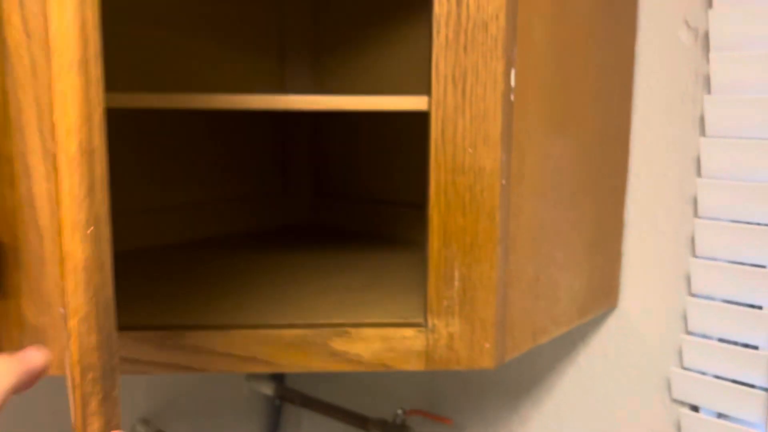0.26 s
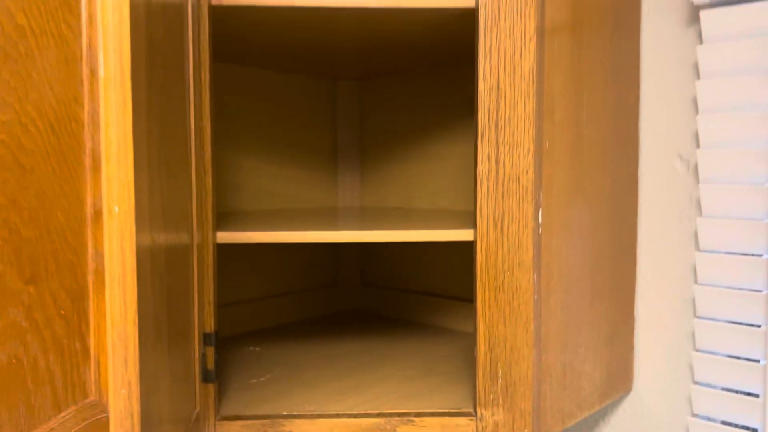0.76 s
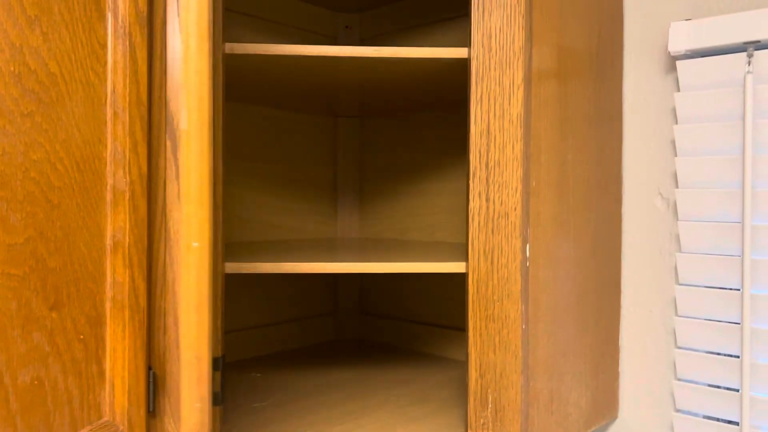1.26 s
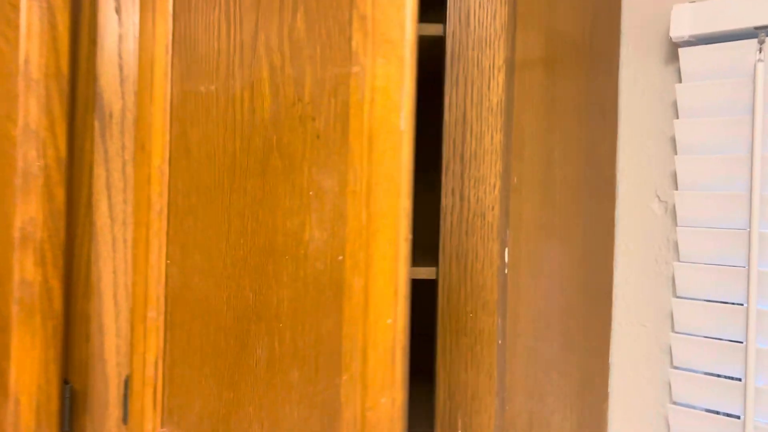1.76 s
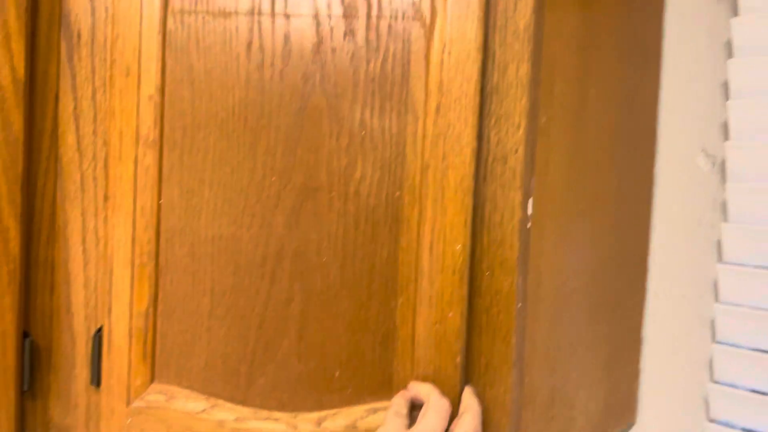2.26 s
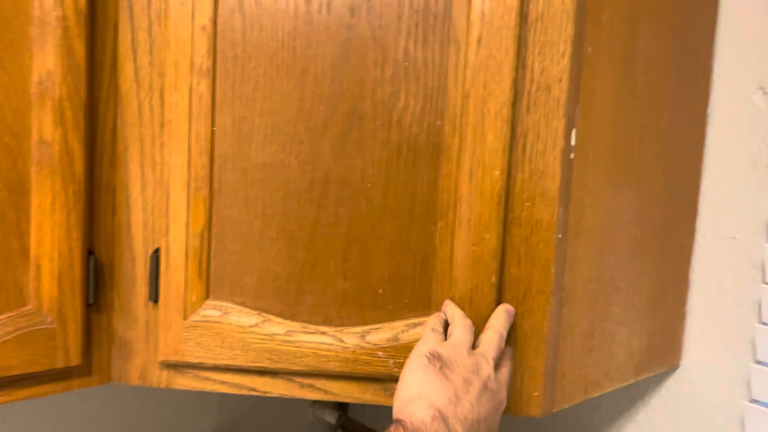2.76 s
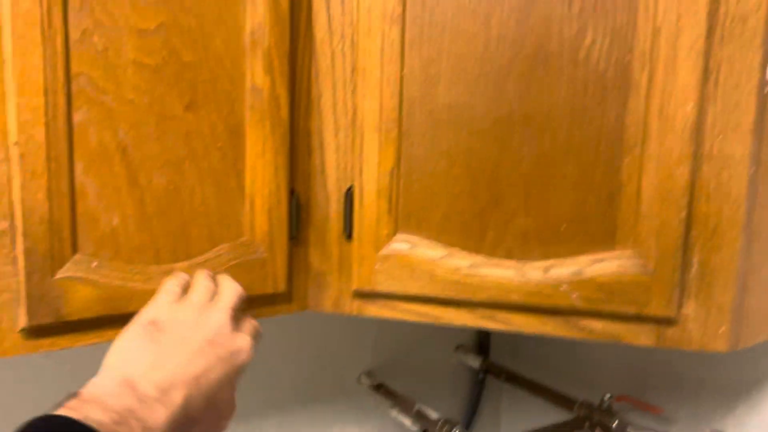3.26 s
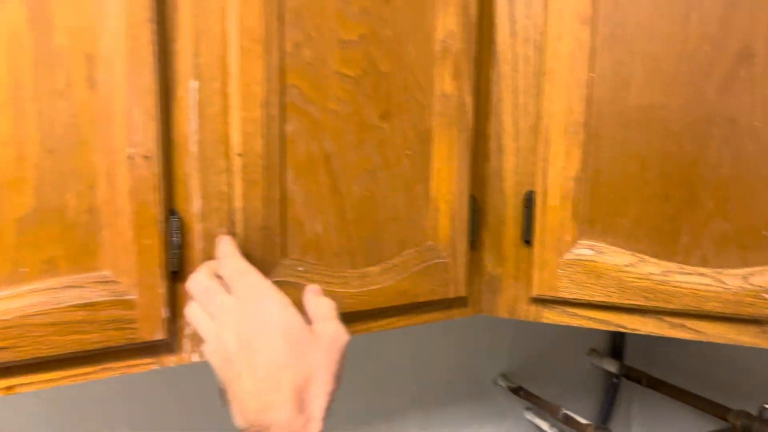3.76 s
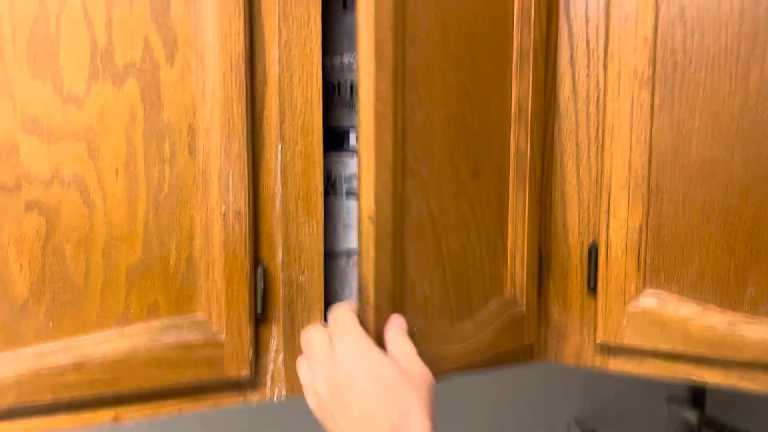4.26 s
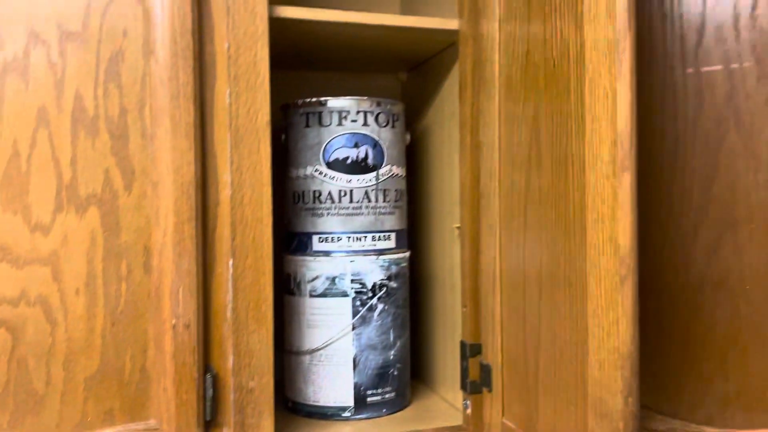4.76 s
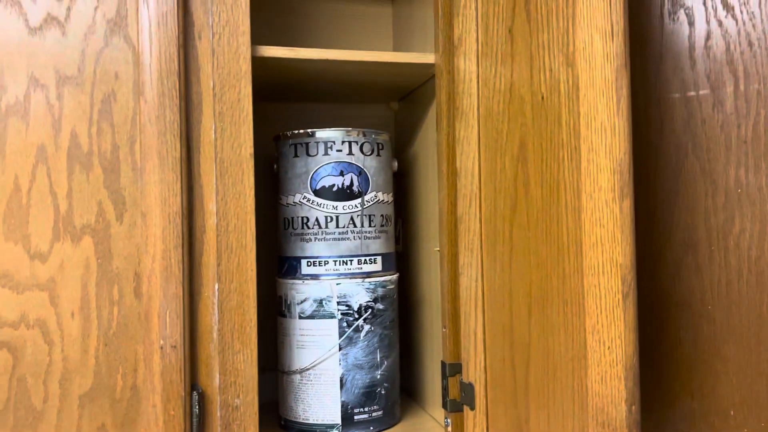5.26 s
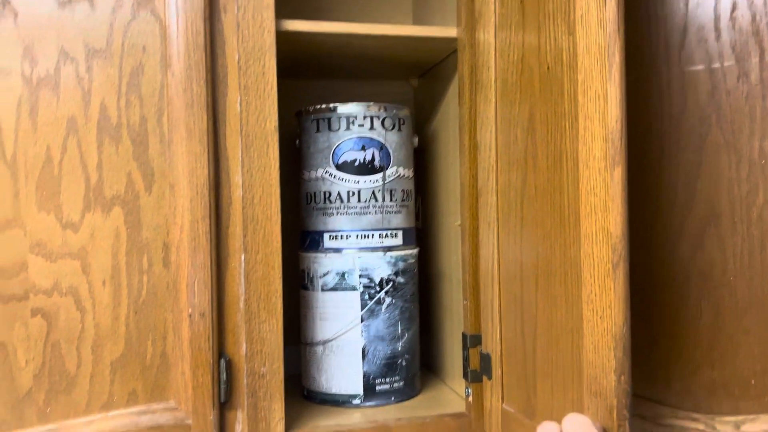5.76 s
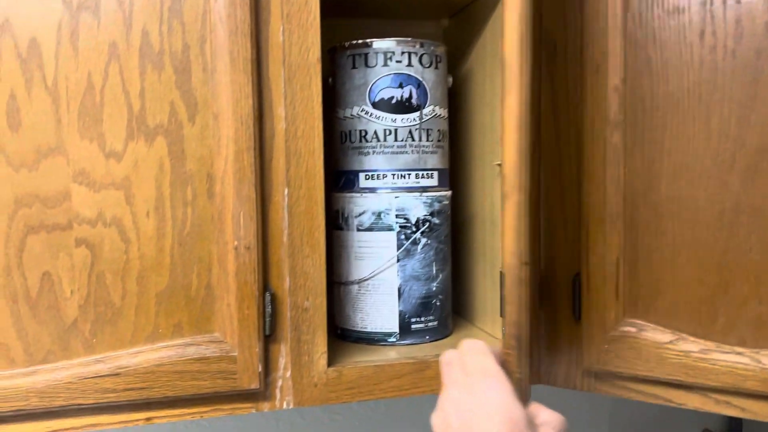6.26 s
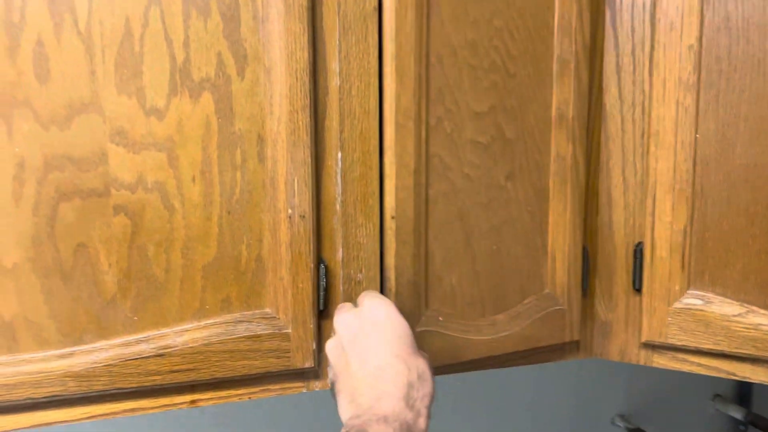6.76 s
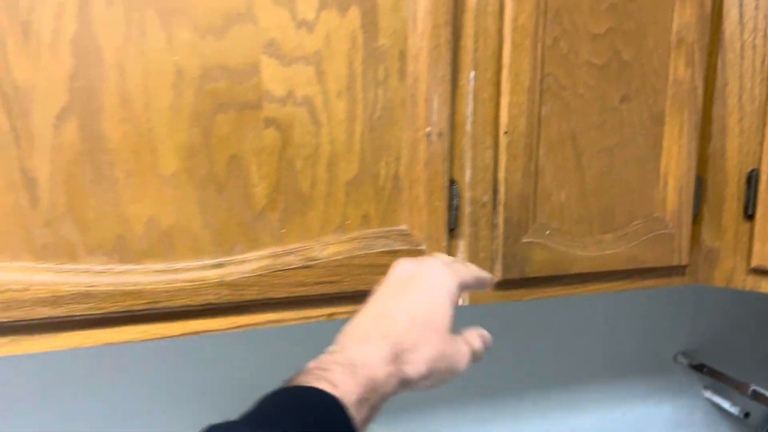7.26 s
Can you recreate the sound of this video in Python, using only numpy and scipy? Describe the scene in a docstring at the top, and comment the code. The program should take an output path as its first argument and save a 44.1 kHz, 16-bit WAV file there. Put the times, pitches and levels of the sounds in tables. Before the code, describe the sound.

Hollow knocks, small clicks and soft rubbing from wooden kitchen cabinet doors moved by hand, until the last one slams shut.

```python
"""A wooden cabinet door knocks and its hinge ticks, over a faint appliance hum in a bare, ringing kitchen.
Doors are pulled open and pushed shut by hand; each blow rings the panel and the carcass.
Hands rub and scuff the wood, and stick-slip makes the moving doors shudder and groan.
The last door slams, bounces and sets its neighbours chattering. The microphone is at arm's length."""
import sys
import numpy as np
from scipy import signal
from scipy.fft import rfft, irfft, next_fast_len
from scipy.io import wavfile
from scipy.ndimage import uniform_filter1d

SR = 44100
rng = np.random.default_rng(int(sys.argv[2]) if len(sys.argv) > 2 else 0)


def int16_out(signal):
    """Quantize to a 16-bit WAV file."""
    q = np.round(np.clip(np.atleast_2d(signal).T, -1, 1) * 32767)
    wavfile.write(sys.argv[1], SR, q.astype(np.int16))


N = 332073
TIME_S = np.arange(N) / SR
AGE_S = TIME_S[:2 * SR // 3]   # time since a contact
BANDS_HZ = np.geomspace(45, 15000, 26)

# kitchen reverberation: (frequency [Hz], t60 [s])
ROOM_T60 = [(60, 0.66), (250, 0.7), (700, 0.77), (2000, 0.63), (5000, 0.52), (8000, 0.46), (14000, 0.11)]
# stereo image by frequency, with a hollow band near 10 kHz:
# (frequency [Hz], channel likeness [0-1], left lead [rad], left minus right [dB])
STEREO_IMAGE = [(60, .98, -.25, -.8), (280, .95, -.45, -1.5), (500, .68, -.55, -2), (750, .42, 1.3, -4),
                (1100, .36, 1.0, -2), (1700, .2, -.3, -.5), (2400, .42, .2, -.5), (3600, .5, .75, 2.2),
                (5300, .33, 0, 2.3), (7500, .72, -.4, .8), (9500, .99, -3.05, 0), (11000, .99, -3.25, 0),
                (12300, .88, -6.1, 0)]

# fan spectrum: (frequency [Hz], relative density [dB])
FAN_COLOUR = [(25, -24), (36, -26), (50, 2.5), (75, -4.5), (150, -10), (350, -13), (560, -22), (1100, -22),
              (1450, -24.5), (1850, -20), (2400, -26.5), (2800, -35.5), (3800, -32.5), (5500, -44),
              (9000, -42), (15000, -54.5)]
# mains harmonics: (frequency [Hz], level [dB])
MAINS_HUM = [(119.9, -58), (239.8, -70.5), (359.7, -66.5), (479.6, -75.5)]
# motor whine: (frequency [Hz], width [Hz], level [dB])
WHINE_LINES = [(962, 8, -84.5), (1079, 8, -78), (1565, 5.1, -76), (1583, 27, -77), (1734, 45, -71.5)]
# faint tone: (peak time [s], level [dB], rise [s], fall [s])
TONE_SWELLS = [(2.2, -62.5, 0.28, 0.18), (3.85, -63, 0.63, 0.6)]

# hand and sleeve over the wood: (peak time [s], level [dB], rise [s])
STROKES = [(0.42, -63.5, 0.1), (0.944, -66.5, 0.33), (1.442, -65, 0.12), (1.758, -67, 0.3),
           (2.902, -64, 0.12), (3.4, -70, 0.57), (3.612, -58, 0.018), (3.805, -61.5, 0.085),
           (4.08, -54.5, 0.086), (4.248, -68, 0.33), (6.28, -68, 0.11), (6.756, -70, 0.44),
           (6.955, -61.5, 0.12), (7.495, -49.5, 0.091)]
# rubbing spectrum: (frequency [Hz], relative density [dB])
RUB_COLOUR = [(200, 9), (900, 16), (2500, 7), (5000, 3), (8000, 2), (11000, -4), (15000, -14)]
# fingers letting go or dragging: (peak time [s], level [dB])
SCUFFS = [(0.455, -63.5), (2.11, -60), (2.215, -62), (2.745, -57.5), (3.108, -50.5)]
# scuff spectrum: (frequency [Hz], relative density [dB])
SCUFF_COLOUR = [(150, -10), (500, 9), (1200, 3.5), (2300, -6), (3500, -23), (8000, -24), (15000, -43)]
# door swings and hand drags: (time of top speed [s], shudder [dB], groan [dB], rise [s], fall [s])
SWINGS = [(0.41, -52, -66.5, 0.13, 0.073), (1.85, -54, -63, 0.088, 0.13), (2.27, -43.5, -66, 0.23, 0.22),
          (3.56, -46.5, -64, 0.084, 0.028), (4.36, -53, -60.5, 0.04, 0.22),
          (6.73, -49.5, -53.5, 0.14, 0.18)]
# stick-slip resonances of whole door and panel: (frequency [Hz], width [Hz], relative level [dB])
SHUDDER_MODES = [(76.6, 6.5, 7.5), (124.3, 2.3, 2), (188, 1.9, 3)]
GROAN_MODES = [(231.3, 8.7, 3.5), (290.5, 12, -3), (325, 21, -2), (405, 21, -23), (600, 770, -12)]

# hinge and fingernail ticks: (time [s], snap [dB], tilt [dB/octave], snap t60 [s],
# hinge ring [dB], stile ring [dB], stile pitch [Hz], stile t60 [s])
TICKS = [(0.0925, -27.5, -2, 0.023, -58, -48, 1430, 0.16), (0.451, -51, -10, 0.06, -70, -68, 1240, 0.04),
         (0.484, -56, -6, 0.12, -75, -72, 1240, 0.04), (1.1077, -44, 4, 0.022, -49, -53, 1270, 0.05),
         (2.702, -57, 3, 0.04, -59, -55.5, 1100, 0.05), (3.4353, -58, 5.5, 0.035, -69, -68, 1250, 0.04),
         (3.6039, -48, -4, 0.077, -68, -67, 1230, 0.036), (3.8804, -36.5, 6, 0.018, -36, -44, 1260, 0.038),
         (4.0225, -47.5, 2, 0.066, -60, -46.5, 1280, 0.3), (4.376, -54, 2, 0.05, -74, -70, 1240, 0.04),
         (4.575, -45.5, -1, 0.013, -49, -52, 1240, 0.061), (4.705, -53, 3, 0.028, -57, -60, 1230, 0.04),
         (5.435, -45.5, 1, 0.037, -49, -49.5, 858, 0.18)]
# snap spectrum: (frequency [Hz], band level [dB])
SNAP_COLOUR = [(300, -72), (700, -34), (1200, -30.5), (2500, -14), (4500, -15.5), (8000, -17), (10800, -6),
               (12800, -44), (15000, -21)]
# hinge leaves: (frequency [Hz], relative level [dB], t60 [s])
HINGE_MODES = [(1500, -21, 0.13), (2200, -16, 0.08), (2590, -13, 0.038), (2770, -25, 0.063),
               (6600, -25, 0.1), (8740, -13, 0.092), (13500, -20, 0.02), (14000, -11, 0.025)]

# crowd of weak wood modes: (frequency [Hz], band level [dB])
WOOD_COLOUR = [(45, -31), (70, -14.5), (150, -22.5), (250, -17.5), (380, -21), (560, -19.5), (800, -20),
               (1400, -20.5), (2300, -21), (3300, -23.5), (5000, -18.5), (7000, -19.5), (8800, -6),
               (11000, -23.5), (15000, -19)]
# wide corner door and narrow middle door, on the frame or ajar on the hinges alone:
# (frequency [Hz], relative level [dB], t60 [s])
CORNER_MODES = [(67, 4, 0.29), (80.7, -2.5, 0.18), (126, 3, 0.21), (149.4, -5.5, 0.17), (186, -5.5, 0.25),
                (222.4, -4, 0.28), (253.3, -8, 0.31), (298.5, -5, 0.28), (341, -15.5, 0.3),
                (374, -3.5, 0.28), (408, -13, 0.4), (464, -20.5, 0.42), (570, -18, 0.22),
                (615, -11.5, 0.17), (665, -21, 0.59), (742, -18.5, 0.36), (1068, -14.5, 0.24),
                (1088, -11, 0.15), (1148, -10, 0.08), (1355, -24, 0.17), (1453, -15.5, 0.1),
                (1690, -18.5, 0.14), (2330, -24, 0.16), (2440, -27, 0.14)]
CORNER_AJAR_MODES = [(125.6, -3, 0.23), (150, -5.5, 0.2), (229.3, -1, 0.26), (250, -1, 0.28),
                     (291, -6.5, 0.33), (410, -9, 0.38), (590, -12.5, 0.26), (780, -20, 0.3),
                     (860, -19, 0.3), (1100, -11, 0.15), (1810, -23, 0.2), (2500, -18, 0.28),
                     (2810, -21, 0.3)]
MIDDLE_MODES = [(67.7, -4, 0.33), (78, -4, 0.55), (92, -4.5, 0.46), (111.5, -6.5, 0.44), (127, -9.5, 0.48),
                (176.6, -10, 0.38), (188.8, -16, 0.43), (220, -8, 0.33), (236, -17, 0.3),
                (274.9, -10, 0.46), (292.2, -6, 0.32), (337, -26, 0.68), (372.7, -19, 0.72),
                (442, -15, 0.35), (459, -16, 0.47), (492.5, -26, 0.53), (555, -23.5, 0.32),
                (662, -20.5, 0.41), (776, -23, 0.21), (836, -26, 0.35), (877, -24.5, 0.48),
                (1034, -19.5, 0.26), (1346, -37, 0.6), (1470, -21, 0.15), (1550, -17.5, 0.12),
                (1758, -15.5, 0.082), (2150, -21.5, 0.26), (2310, -21, 0.19), (2390, -15, 0.08),
                (2505, -22, 0.12), (2765, -21, 0.12), (2920, -29, 0.3), (4560, -26, 0.1), (6330, -18, 0.07)]
MIDDLE_AJAR_MODES = [(72, -8, 0.45), (95, -1.5, 0.48), (126, -5.5, 0.5), (210, -9.5, 0.29), (233, -5, 0.16),
                     (293, -9, 0.35), (340, -20.5, 0.53), (385, -17, 0.37), (468, -7, 0.28),
                     (620, -22, 0.55), (745, -13.5, 0.26), (900, -18, 0.28), (1045, -21, 0.3),
                     (1606, -11, 0.13), (2300, -23, 0.18)]
DOOR_MODES = {"corner": CORNER_MODES, "corner ajar": CORNER_AJAR_MODES,
              "middle": MIDDLE_MODES, "middle ajar": MIDDLE_AJAR_MODES}
# spring-back off frame or hinge, by door: (delay of first rebound [s])
REBOUND_S = {"corner": 0.056, "corner ajar": 0.047, "middle": 0.067, "middle ajar": 0.085}
# door balance, rightward in the midrange: (frequency [Hz], left minus right [dB])
DOOR_BALANCE = [(100, -0.5), (450, -0.5), (1100, -2), (2200, -2.5), (4500, 0.5), (9000, -1.7)]
# door on frame or hand on door, one row per corner that meets or leaves the frame: (time [s], door,
# knock [dB], brightness [Hz], boom [dB], boom pitch [Hz], boom lag [s], first rebound loss [dB])
BLOWS = [(0.0912, "corner ajar", -29.5, 11200, -26, 244, 0.0165, 29),
         (2.041, "corner", -45.5, 900, -36.5, 263, 0.019, 6),
         (2.112, "corner", -51, 1200, -36, 198, 0.012, 15),
         (2.204, "corner", -50.5, 1300, -33, 154, 0.005, 1.5),
         (2.266, "corner", -55, 900, -32, 150, 0.0059, 12),
         (2.404, "corner", -41, 1400, -28, 104, 0.018, 17),
         (2.525, "corner", -37, 910, -29, 220, 0.0025, 26),
         (2.534, "corner", -20, 1500, -13, 113, 0.009, 26.5),
         (2.582, "corner", -38.5, 706, -27.5, 343, 0.00496, 34),
         (2.697, "corner", -37.5, 1400, -24.5, 78, 0.017, 7),
         (2.756, "corner", -34, 1390, -21.5, 78, 0.012, 13),
         (2.772, "corner", -50, 450, -33, 260, 0.0049, 12),
         (2.798, "corner", -37, 1300, -25.5, 72, 0.014, 17),
         (2.816, "corner", -50, 450, -39, 300, 0.005, 12),
         (3.096, "corner", -43.5, 1900, -65, 302, 0.0093, 15),
         (3.437, "middle ajar", -60, 900, -26, 92, 0.0073, 3.5),
         (3.612, "middle ajar", -47.5, 2500, -35.5, 258, 0.0061, 7),
         (4.018, "middle ajar", -30, 1750, -17, 227, 0.00254, 36),
         (4.029, "middle ajar", -33.5, 620, -13, 123, 0.0022, 26),
         (4.074, "middle ajar", -36.5, 600, -32.5, 270, 0.00413, 22),
         (4.128, "middle ajar", -55, 600, -43, 115, 0.0057, 18),
         (4.16, "middle ajar", -59, 700, -40, 186, 0.004, 12),
         (5.437, "middle ajar", -52, 1200, -36.5, 195, 0.0085, 15),
         (7.1763, "middle", -8, 2500, -11, 255, 0.0042, 30),
         (7.182, "middle", -5, 7640, -17.5, 110, 0.011, 34),
         (7.1875, "middle", -4, 2880, -3.5, 192, 0.003, 32.5),
         (7.212, "middle", -8, 1050, -22, 380, 0.0026, 19),
         (7.2497, "middle", -9.5, 2100, -11.5, 95, 0.005, 12)]


def from_db(db):
    return 10 ** (np.asarray(db) / 20)


def unit_rms(x):
    return x / np.sqrt(np.mean(x ** 2) + 1e-20)


def at_hz(points, hz, column=1):
    """Table column, interpolated over log frequency."""
    table = np.array(points)
    return np.interp(np.log(np.maximum(hz, 1)), np.log(table[:, 0]), table[:, column])


def add(out, time_s, sound):
    start = round(time_s * SR)
    out[:, start:start + sound.shape[-1]] += sound[..., :N - start]


def swell(peak_s, db, rise_s, fall_s):
    """Exponential rise and fall; time constants of at least 10 ms."""
    distance = np.maximum((peak_s - TIME_S) / max(rise_s, .01), (TIME_S - peak_s) / max(fall_s, .01))
    return from_db(db) * np.exp(-np.minimum(distance, 9))


def decay(t60_s):
    return from_db(-60 * AGE_S / np.maximum(t60_s, .002))


def build_up(hz, cycles):
    """Mode onset, slower at low frequencies."""
    return 1 - np.exp(-AGE_S * hz / cycles)


def diffuse_noise(size, colour=None):
    """Noise from all around, channel likeness set by frequency; rms 1."""
    hz = np.fft.rfftfreq(size, 1 / SR)
    alike = np.clip(at_hz(STEREO_IMAGE, hz), 0, 1)
    mid, side = rfft(rng.standard_normal((2, size)))
    spectrum = np.sqrt(1 + alike) * mid + np.sqrt(1 - alike) * side * [[1], [-1]]
    gain = from_db(at_hz(colour, hz)) if colour else 1
    return unit_rms(irfft(gain * spectrum, size))


def mode_crowd():
    """Dense overlapping modes as levelled third-octave noise: bands x 2 x samples."""
    white = [diffuse_noise(2 * SR) for _ in range(2)]
    edge_ratio = np.sqrt(BANDS_HZ[1] / BANDS_HZ[0])
    bands = []
    for k, hz in enumerate(BANDS_HZ):
        bandpass = signal.butter(2, [hz / edge_ratio, hz * edge_ratio], "band", fs=SR, output="sos")
        band = signal.sosfilt(bandpass, white[k % 2])
        power = uniform_filter1d(np.mean(band ** 2, axis=0), int(SR * max(10 / hz, .01)))
        bands.append(band / np.sqrt(power + 1e-12))
    return np.array(bands, dtype=np.float32)


def band_envelope(own_t60_s, room_db, cycles):
    """The object's own ring plus the room's tail: bands x samples."""
    hz = BANDS_HZ[:, None]
    room = from_db(room_db) * decay(at_hz(ROOM_T60, hz))
    return build_up(hz, cycles) * np.hypot(decay(own_t60_s), room)


def strike(crowd, envelope, gains):
    """Each contact excites the mode crowd in its own random way."""
    start = rng.integers(SR // 10, SR)
    weights = (gains[:, None] * envelope).astype(np.float32)
    return np.einsum("bt,bct->ct", weights, crowd[:, :, start:start + len(AGE_S)])


def pan(x, balance):
    """Left-right balance by frequency."""
    size = next_fast_len(N + SR // 10)
    side_db = at_hz(balance, np.fft.rfftfreq(size, 1 / SR))
    return irfft(rfft(x, size) * from_db([side_db / 2, -side_db / 2]), size)[:, :N]


def appliance(fan_db=-55.5):
    """Steady fan noise plus mains harmonics."""
    hum = sum(np.sqrt(2) * from_db(db) * np.sin(2 * np.pi * (hz * TIME_S + rng.random()))
              for hz, db in MAINS_HUM)
    return hum + from_db(fan_db) * diffuse_noise(next_fast_len(N), FAN_COLOUR)[:, :N]


def motor_whine():
    """The appliance's motor sings in narrow, wavering lines."""
    size = next_fast_len(N)
    hz = np.fft.rfftfreq(size, 1 / SR)
    power = sum(from_db(db) ** 2 * SR / (np.pi * width_hz) / (1 + (2 * (hz - line_hz) / width_hz) ** 2)
                for line_hz, width_hz, db in WHINE_LINES)
    return irfft(rfft(diffuse_noise(size)) * np.sqrt(power), size)[:, :N]


def faint_tone(hz=809):
    """A thin tone swells and fades."""
    return sum(swell(*row) for row in TONE_SWELLS) * np.sin(2 * np.pi * hz * TIME_S)


def rubbing(fall_ratio=1.18):
    """Skin and cloth slide over varnished wood."""
    power = sum(swell(peak_s, db, rise_s, rise_s * fall_ratio) ** 2 for peak_s, db, rise_s in STROKES)
    return np.sqrt(power) * diffuse_noise(next_fast_len(N), RUB_COLOUR)[:, :N]


def scuffs(rise_s=0.01, fall_s=0.073):
    """Fingertips catch and slide off with a short, dull rasp."""
    gain = sum(swell(peak_s, db, rise_s, fall_s) for peak_s, db in SCUFFS)
    return gain * diffuse_noise(next_fast_len(N), SCUFF_COLOUR)[:, :N]


def slip_resonances(slips, modes):
    """Resonances driven by slips, each kept even by the steady hand; rms 1."""
    out = 0
    for hz, width_hz, db in modes:
        radius = np.exp(-np.pi * width_hz / SR)
        feedback = [1, -2 * radius * np.cos(2 * np.pi * hz / SR), radius ** 2]
        ring = signal.lfilter([1, 0, -1], feedback, slips)
        power = np.abs(uniform_filter1d(ring ** 2, SR // 12))
        out = out + from_db(db) * ring / np.sqrt(power + 1e-9)
    return unit_rms(out)


def shudder(slips_per_s=900, lowpass_hz=900):
    """Soft, uneven stick-slip shakes the door and makes its panel groan, most at top speed."""
    slips = (rng.random(N) < slips_per_s / SR) * rng.choice([-1., 1.], N) + 1e-18
    slips = signal.sosfilt(signal.butter(3, lowpass_hz, fs=SR, output="sos"), slips)
    shake, groan = slip_resonances(slips, SHUDDER_MODES), slip_resonances(slips, GROAN_MODES)
    return sum(swell(peak_s, 0, rise_s, fall_s) * (from_db(shake_db) * shake + from_db(groan_db) * groan)
               for peak_s, shake_db, groan_db, rise_s, fall_s in SWINGS)


def stile_ring(hz, t60_s, spread=0.0556):
    """Wood under a hinge: three close, beating modes."""
    modes_hz = hz * np.array([[1 - spread], [1], [1 + spread / 2]])
    partials = np.sin(2 * np.pi * (modes_hz * AGE_S + rng.random((3, 1))))
    return np.sum(partials, axis=0) / np.sqrt(3) * build_up(hz, cycles=0.95) * decay(t60_s)


def ticks(crowd, room_db=-15, reference_t60_s=0.02):
    """Small hard contacts: a snap or scratch with room tail, plus hinge and stile ring."""
    out = np.zeros((2, N))
    onset = build_up(BANDS_HZ[:, None], cycles=1)
    room = from_db(room_db) * decay(at_hz(ROOM_T60, BANDS_HZ[:, None]))
    hz, mode_db, t60_s = np.transpose(HINGE_MODES)[:, :, None]
    hinge = np.sum(from_db(mode_db) * np.sin(2 * np.pi * hz * AGE_S) * decay(t60_s), axis=0)
    for time_s, snap_db, db_per_octave, snap_t60_s, hinge_db, stile_db, stile_hz, stile_t60_s in TICKS:
        room_power = room ** 2 * snap_t60_s / reference_t60_s   # longer scratches fill the room more
        envelope = onset * np.sqrt(decay(snap_t60_s) ** 2 + room_power)
        band_db = snap_db + at_hz(SNAP_COLOUR, BANDS_HZ) + db_per_octave * np.log2(BANDS_HZ / 4000)
        add(out, time_s, strike(crowd, envelope, from_db(band_db)))
        stile = from_db(stile_db) * stile_ring(stile_hz, stile_t60_s)
        add(out, time_s, from_db(hinge_db) * hinge + stile)
    return out


def knock(hz, db, bright_hz, highpass_hz=300, rolloff_order=1.56):
    """Force spectrum of a hard edge contact; drives the upper modes."""
    highpass = hz ** 2 / (hz ** 2 + highpass_hz ** 2)
    return from_db(db) * highpass / np.sqrt(1 + (hz / bright_hz) ** (2 * rolloff_order))


def boom(hz, db, boom_hz, width_octaves=0.5):
    """Force spectrum of the slower push of the door's mass; drives the low modes."""
    return from_db(db) / (1 + (np.log2(hz / boom_hz) / width_octaves) ** 2 / 2) ** 2


def chatter(crowd, start_s=7.205, gap_s=0.021, count=10, start_db=-14.5, fade_db_per_s=80, scatter_db=4):
    """Shaken by the slam, neighbouring doors clack on their frames in an uneven, dying run."""
    out = np.zeros((2, N))
    envelope = band_envelope(own_t60_s=0.03, room_db=-17, cycles=0.5)
    wood = from_db(at_hz(WOOD_COLOUR, BANDS_HZ))
    for k in range(count):
        delay_s = gap_s * (k + rng.uniform(-0.34, .3))
        offset_db = scatter_db * (rng.normal() + rng.normal(size=len(BANDS_HZ)))
        db = start_db - fade_db_per_s * delay_s + offset_db
        force = knock(BANDS_HZ, db, bright_hz=1800, highpass_hz=500)
        add(out, start_s + delay_s, strike(crowd, envelope, wood * force))
    return out


def contacts(time_s, door, knock_db, bright_hz, boom_db, boom_hz, lag_s, loss_db,
             thud_db=-18, thud_hz=600, gap_ratio=0.94, loss_growth=4.5, rebound_hz=1740):
    """One blow: edge knock, panel boom with dull thud, up to two rebounds. Yields (time, force(hz))."""
    yield time_s, lambda hz: knock(hz, knock_db, bright_hz)
    yield time_s + lag_s, lambda hz: np.hypot(boom(hz, boom_db, boom_hz),
                                              knock(hz, boom_db + thud_db, thud_hz))
    for k in range(2):
        time_s += REBOUND_S[door] * gap_ratio ** k
        gain = from_db(-loss_db * loss_growth ** k)
        dull_hz = min(bright_hz, rebound_hz / (k + 1))
        if gain > 1e-3:
            yield time_s, lambda hz: gain * np.hypot(knock(hz, knock_db, dull_hz),
                                                     boom(hz, boom_db, boom_hz))


def doors(crowd, wood_t60_at_1khz_s=0.19, crack_t60_s=0.03, modes_db=-8.5, flex_db=5, flex_t60_s=0.035):
    """Each blow cracks at the edge, then rings the door's clear modes over a crowd of weak ones."""
    out = np.zeros((2, N))
    wood = from_db(at_hz(WOOD_COLOUR, BANDS_HZ))
    wood_t60_s = wood_t60_at_1khz_s * (1000 / BANDS_HZ[:, None]) ** 0.5
    crack = decay(crack_t60_s) * build_up(BANDS_HZ[:, None], cycles=1.5)
    crowd_envelope = np.hypot(crack, band_envelope(wood_t60_s, room_db=-7, cycles=0.19))
    flex = from_db(flex_db) * decay(flex_t60_s)   # first large flexing, soon damped by the frame
    for door, modes in DOOR_MODES.items():
        hz, mode_db, t60_s = np.transpose(modes)[:, :, None]
        envelope = from_db(mode_db + modes_db) * build_up(hz, cycles=0.45) * (decay(t60_s) + flex)
        phase_cycles = hz * AGE_S + rng.random(hz.shape)
        rings = (envelope * np.exp(2j * np.pi * phase_cycles)).astype(np.complex64)
        for blow in [row for row in BLOWS if row[1] == door]:
            for time_s, force in contacts(*blow):
                in_phase = np.exp(2j * np.pi * hz[:, 0] * time_s)   # a bounce tops up each mode's swing
                drive = (force(hz[:, 0]) * in_phase).astype(np.complex64)
                add(out, time_s, np.real(drive @ rings))
                add(out, time_s, strike(crowd, crowd_envelope, wood * force(BANDS_HZ)))
    return pan(out, DOOR_BALANCE)


def scene():
    crowd = mode_crowd()
    handling = doors(crowd) + ticks(crowd) + shudder() + rubbing() + scuffs()
    background = appliance() + motor_whine() + faint_tone()
    return background + handling + chatter(crowd)


def record(dry):
    """Phase and level offset between the channels, soft clipping, steep low-pass."""
    size = next_fast_len(N + SR // 10)
    hz = np.fft.rfftfreq(size, 1 / SR)
    left_gain = np.sqrt(from_db(at_hz(STEREO_IMAGE, hz, column=3)))
    left_lead = np.exp(1j * at_hz(STEREO_IMAGE, hz, column=2))
    heard = irfft(rfft(dry, size) * [left_gain * left_lead, 1 / left_gain], size)[:, :N]
    lowpass = signal.cheby2(14, 70, 16600, fs=SR, output="sos")   # 70 dB down from 16.6 kHz
    return signal.sosfilt(lowpass, np.tanh(heard))


dry = scene()
out = record(dry)
int16_out(out)
```